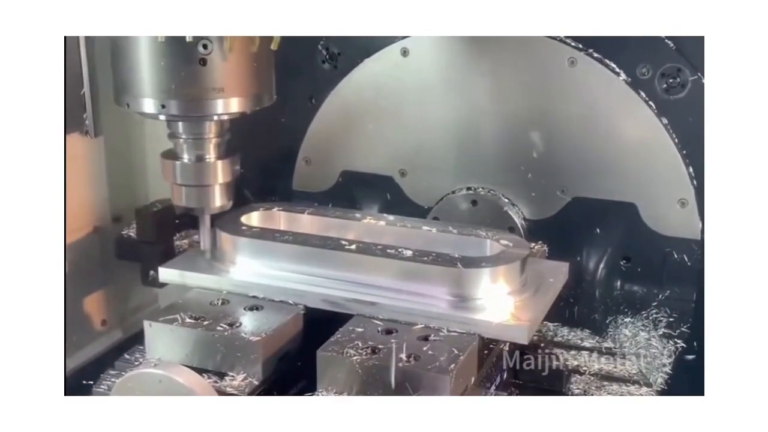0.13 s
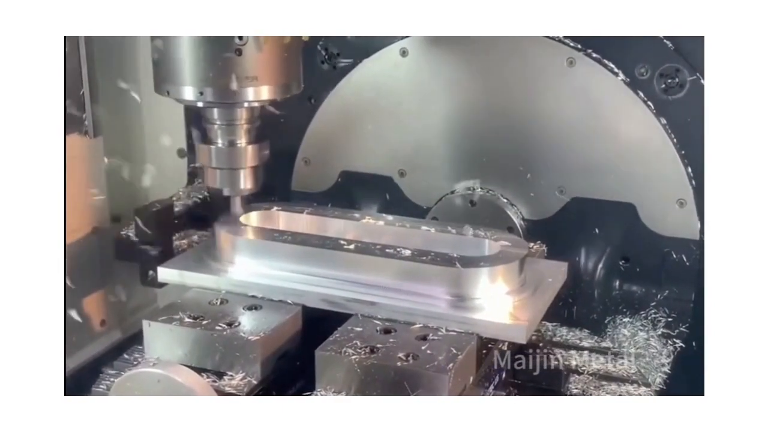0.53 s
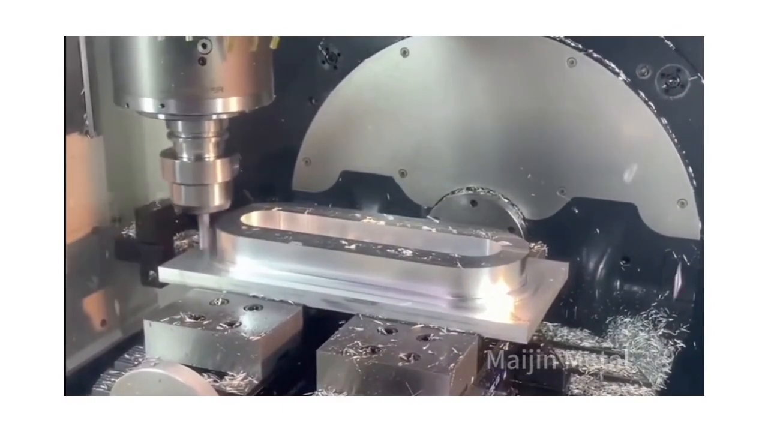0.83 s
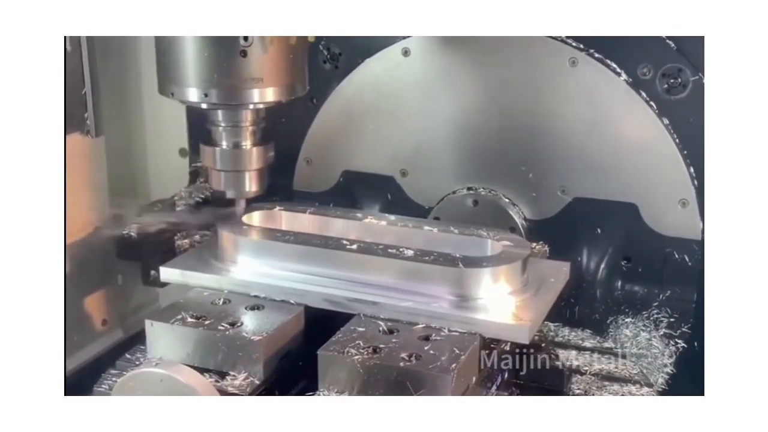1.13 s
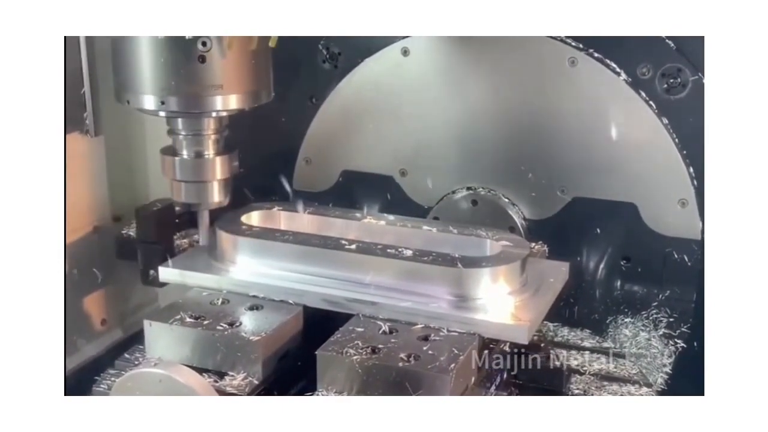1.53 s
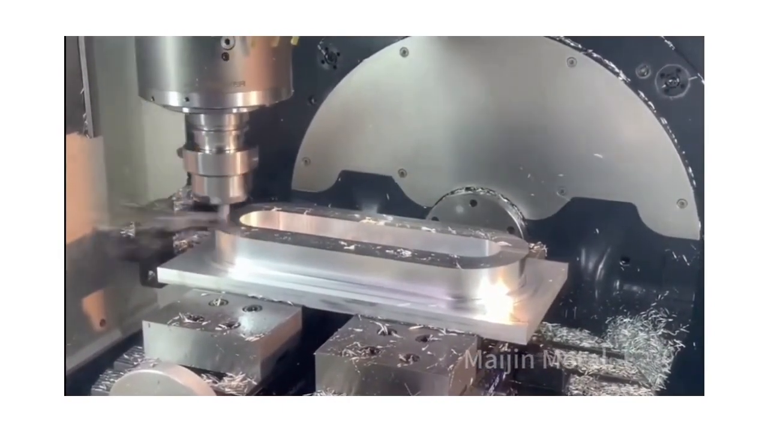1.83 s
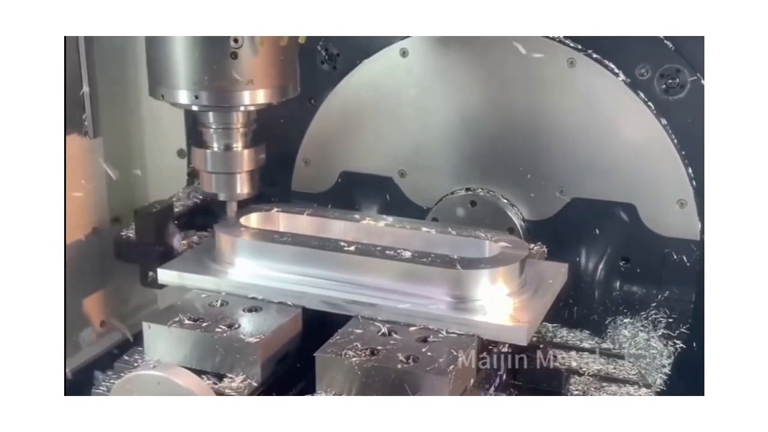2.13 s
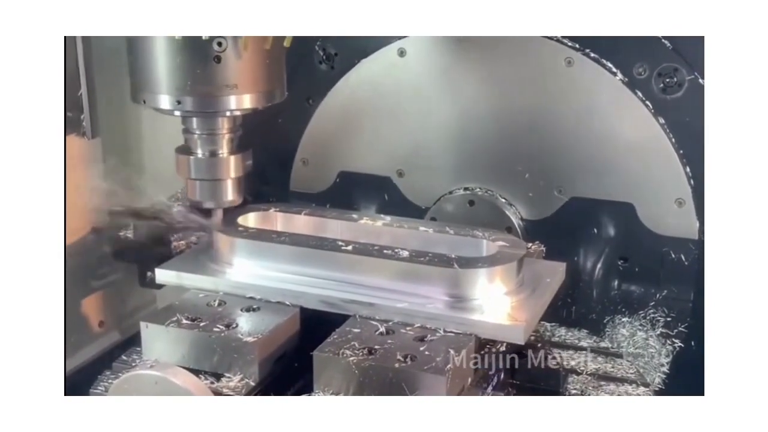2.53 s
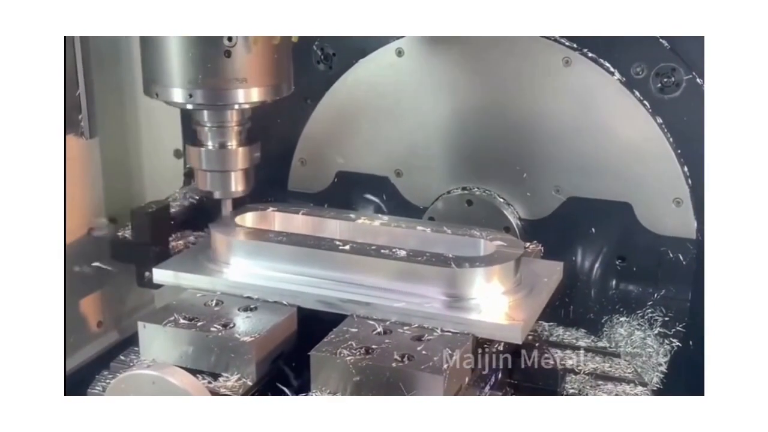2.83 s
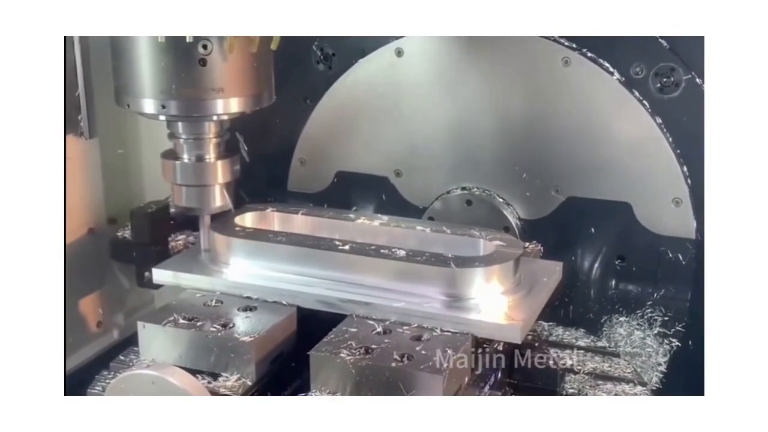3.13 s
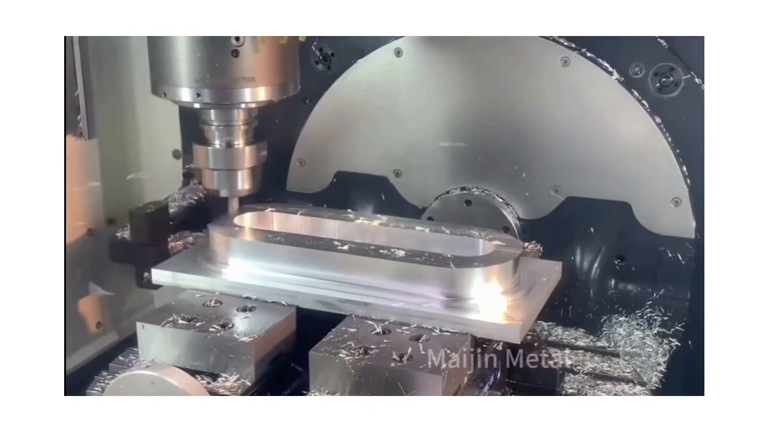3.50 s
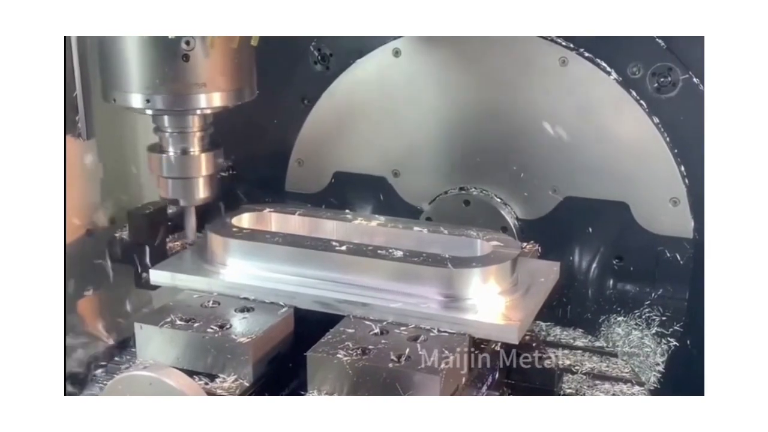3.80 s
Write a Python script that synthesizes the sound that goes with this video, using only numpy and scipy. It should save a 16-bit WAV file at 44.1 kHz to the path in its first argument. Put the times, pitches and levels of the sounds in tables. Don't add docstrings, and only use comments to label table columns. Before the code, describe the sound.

A milling machine spindle hums steadily while its cutter sings through aluminium in regular short sweeps.

```python
import sys
import numpy as np
from scipy import signal
from scipy.fft import rfft, irfft, next_fast_len
from scipy.io import wavfile
from scipy.ndimage import uniform_filter1d, map_coordinates

SR = 44100
rng = np.random.default_rng(int(sys.argv[2]) if len(sys.argv) > 2 else 0)


def dump_mix(stems):
    frames = np.atleast_2d(stems).T
    limited = np.clip(frames, -1, 1)
    pcm = np.round(limited * 32767).astype(np.int16)
    wavfile.write(sys.argv[1], SR, pcm)


def gain_from_db(level_db):
    decades = np.asarray(level_db, float) / 20
    return 10 ** decades


N = 174636
TIME = np.arange(N) / SR

# (deepest moment [s], strength [dB], length factor [-], entry squeak [dB], whistle [dB])
CUTS = [
    (0.044, 1.5, 0.99, -3, 2.5),
    (0.812, -0.5, 1.1, -11.5, -3.5),
    (1.583, -0.5, 0.98, -2.5, 0),
    (2.363, -1, 0.967, 0.5, 1.5),
    (3.102, -1.5, 0.87, 4, -17),
    (3.84, -2, 0.81, 5, -6),
]
STRENGTH, SQUEAK, WHISTLE = 1, 3, 4
TOOL_HZ = 9207, 11197


def unit(x):
    return x / np.sqrt(np.mean(x ** 2) + 1e-20)


def curve(rows):
    return np.interp(TIME, *np.transpose(rows))


def wobble(rate):
    coarse_steps = np.arange(0, N + 64, 64)
    smooth = map_coordinates(rng.standard_normal(400), [coarse_steps * rate / SR])
    return np.interp(np.arange(N), coarse_steps, smooth)


def stage(lag_s, width_s, fall_s=None, column=None, flat=2, follows=1):
    t = np.arange(0, N + 64, 64) / SR
    bells = 0
    for cut in CUTS:
        away = (t - cut[0]) / cut[2] - lag_s
        width = np.where(away > 0, fall_s or width_s, width_s)
        height = gain_from_db(follows * cut[column] if column else 0)
        bells = bells + height * np.exp(-.5 * np.abs(away / width) ** flat)
    return np.interp(TIME, t, bells)


def filtered(x, response):
    size = next_fast_len(N + 8192)
    return irfft(rfft(x, size) * response(np.fft.rfftfreq(size, 1 / SR)), size)[..., :N]


def rush(points, patchy_db):
    z = signal.stft(rng.standard_normal(N), nperseg=512)[2]
    patches = uniform_filter1d(rng.standard_normal(z.shape), 6, 0)
    patches = uniform_filter1d(patches, 10, 1)
    x = signal.istft(z * gain_from_db(patchy_db * unit(patches)), nperseg=512)[1][:N]
    f, db = np.transpose(points)
    return unit(filtered(x, lambda hz: gain_from_db(np.interp(np.log(hz + 1), np.log(f + 1), db))))


def tone(phase):
    return np.sqrt(2) * np.sin(phase + 2 * np.pi * rng.random())


def shaft():
    turns_per_s = 326.45 - 1.4 * stage(0, 0.0562, column=STRENGTH)
    return 2 * np.pi * np.cumsum(turns_per_s) / SR


def frame_rumble():
    # (frequency [Hz], level per Hz [dB])
    colour = [(12, -40), (30, 3), (60, -1.5), (95, -4.5), (170, -1), (260, -11), (450, -16), (1000, -27),
              (1500, -46)]
    return gain_from_db(-28.5 + 1.9 * wobble(3.2)) * rush(colour, patchy_db=1.5)


def air_hiss():
    # (frequency [Hz], level per Hz [dB])
    colour = [(500, -48), (1000, 0.5), (1500, 0), (2200, -2), (4000, -1), (6600, -2.5), (7300, -7),
              (8300, -4), (15500, -8.5)]
    return gain_from_db(-41 + 0.067 * wobble(4.8)) * rush(colour, patchy_db=1.1)


def pumps():
    # (pitch [Hz], level [dB], unsteadiness [dB], pitch drift [Hz])
    pump_tones = [
        (40.3, -41, 5.5, 0.95),
        (61, -36.5, -2, 1.66),
        (126.6, -47.5, 0, 2.96),
    ]
    # (time [s], level [dB])
    drive_effort = [(0.0, -19.5), (0.2, -50), (0.37, -27), (2.21, -29.5), (2.38, -16), (2.76, -28),
                    (2.86, -22.5), (3.28, -24), (3.32, -61), (3.36, -24.5), (3.75, -35), (3.78, -14),
                    (3.83, -40), (3.96, -20)]
    low = 0
    for hz, db, rough_db, drift_hz in pump_tones:
        angle = 2 * np.pi * np.cumsum(hz + drift_hz * wobble(7)) / SR
        low = low + gain_from_db(db + rough_db * wobble(14)) * tone(angle)
    effort = curve(drive_effort)
    return low * gain_from_db(effort - effort.mean())


def fan():
    # (time [s], level [dB])
    fan_level = [(0.0, -30), (0.05, -23), (0.21, -45), (0.3, -28.5), (0.45, -37), (0.82, -24.5),
                 (1.12, -39.5), (1.18, -54), (1.3, -30), (1.63, -31), (2.04, -43), (2.14, -26), (2.35, -41),
                 (2.47, -29), (3.62, -30), (3.68, -21.5), (3.84, -48), (3.96, -22)]
    angle = 2 * np.pi * np.cumsum(174 + 0.68 * wobble(6)) / SR
    return gain_from_db(curve(fan_level) + wobble(25)) * tone(angle)


def spindle(angle):
    # (multiple of shaft speed [-], level [dB], change at entry [dB], change in bite [dB],
    # unsteadiness [dB])
    hum = [
        (1, -27, -6.5, -1.5, 1.04),
        (2, -40, -2, 4.5, 0.5),
        (3, -46.5, 0.5, -2.5, 2.5),
    ]
    entry, bite = stage(-0.099, 0.061), stage(0.046, 0.1)
    out = 0
    for order, db, entry_db, bite_db, rough_db in hum:
        level = gain_from_db(db + entry_db * entry + bite_db * bite + rough_db * wobble(21.22))
        out = out + level * tone(order * angle)
    return out


def bearings(angle):
    level = gain_from_db(-69) + gain_from_db(-65) * stage(0.013, 0.049)
    return level * sum(gain_from_db(4 * wobble(9)) * tone(k / 2 * angle) for k in range(15, 55))


def chip_spray(angle):
    # (time [s], level [dB], length factor [-])
    bursts = [
        (.04, 3.5, 1.1),
        (0.822, 2, 1.1),
        (1.575, 2, 0.97),
        (2.37, 0, 0.85),
        (3.115, -1.5, 0.95),
        (3.85, -0.5, 0.71),
    ]
    # (frequency [Hz], level per Hz [dB])
    colour = [(1200, -52), (2200, -0.5), (3000, -8.5), (4500, 0), (8500, -2.5), (12500, -3.5), (15500, 1)]
    rise_s, fall_s = 0.022, 0.048
    spray = 0
    for start, db, length in bursts:
        width = length * np.where(TIME > start, fall_s, rise_s)
        spray = spray + gain_from_db(db) * np.exp(-.5 * ((TIME - start) / width) ** 2)
    pulse = 1 + 0.08 * np.cos(angle)
    return gain_from_db(-32) * spray * pulse * gain_from_db(0.7 * wobble(60)) * rush(colour, patchy_db=2)


def whistles(angle):
    # (level when free [dB], level in bite [dB], swing with the shaft [dB])
    levels = [
        (-52.5, -45.5, -11),
        (-103, -56.5, -30),
    ]
    bite = stage(0, 0.08, column=WHISTLE)
    out = 0
    for hz, (free_db, bite_db, swing_db) in zip(TOOL_HZ, levels):
        level = (gain_from_db(free_db) + gain_from_db(bite_db) * bite) * gain_from_db(1.5 * wobble(18))
        swing = 1 + 2 * gain_from_db(swing_db) * np.cos(angle)
        out = out + level * swing * tone(2 * np.pi * hz * TIME + .5 * wobble(40))
    return out


def teeth(angle):
    # (multiple of shaft speed [-], entry lead [s], entry [dB], bite [dB], exit [dB])
    rings = [
        (4, 0.15, -45.5, -42.5, -54.5),
        (5, 0.093, -47.5, -20.5, -44),
        (6, 0.17, -72, -47.5, -48.5),
        (7, 0.147, -55, -54, -54),
        (8, 0.21, -59, -50.5, -67),
        (10, .12, -119, -58, -103),
        (12, 0.092, -42, -49, -53.5),
    ]
    entry_s, bite_s, exit_s, exit_lag_s = 0.03, 0.069, 0.1, 0.14
    leave_s = 0.088
    rough_db = 3.5
    bite = stage(0, bite_s, column=STRENGTH, flat=2.1)
    bite = bite * np.minimum(1, stage(0, .3, 1.15 * leave_s, flat=8.7))
    leave = stage(exit_lag_s, bite_s, exit_s)
    out = 0
    for order, lead_s, entry_db, bite_db, exit_db in rings:
        if order == 5:
            follows, bite_rough_db, exit_db = -1.3, 0.5, -46
            entry_level = gain_from_db(-46)
        else:
            follows, bite_rough_db = float(order > 10), rough_db
            entry_level = -gain_from_db(entry_db + rough_db / 2 * wobble(29.89))
        entry = stage(-lead_s, entry_s, column=SQUEAK, follows=follows)
        level = gain_from_db(bite_db + bite_rough_db * wobble(29.83)) * bite
        level = level + gain_from_db(exit_db + rough_db * wobble(30.35)) * leave
        level = level + entry_level * entry
        out = out + tone(order * angle) * level
    return out


def scene():
    angle = shaft()
    background = frame_rumble() + air_hiss() + pumps() + fan()
    machine = spindle(angle) + bearings(angle)
    cutting = chip_spray(angle) + whistles(angle) + teeth(angle)
    return np.tile(background + machine + cutting, (2, 1))


def streaks(x):
    hz, _, z = signal.stft(x, SR, nperseg=2048)
    ratio = np.abs(z) / (uniform_filter1d(np.abs(z), size=12, axis=0) + 1e-9)
    gain = np.where(hz[:, None] > 2100, np.clip(ratio, 0, 1.6) ** 0.6, 1)
    return signal.istft(z * gain, SR, nperseg=2048)[1][:N]


def gaps_and_chirps(x):
    # (edge number [-], level [dB])
    chirps = [(12, -64), (13, -59), (14, -54), (15, -60), (16, -67), (17, -66), (18, -60), (19, -60),
              (20, -59), (21, -59), (22, -66)]
    # (frequency [Hz], leaning towards silence [-])
    gap_bias = [(8200, -3), (8900, -1.6), (9100, -.4), (10500, -.3), (11300, 1.3), (12500, .4), (14800, .7),
                (15300, 6)]
    edge_hz, chirp_width_hz = SR / 64, 27.5
    hz, t, z = signal.stft(x, SR, nperseg=1024)
    column_hz = hz[:, None]

    def at_frames(v):
        return np.interp(t, TIME, v)

    hole_shape = np.exp(-.5 * ((column_hz - 1854) / 185) ** 4)
    hole_db = -45 * at_frames(stage(-0.11, 0.024)) * hole_shape

    band = (hz / edge_hz * 2).astype(int) // 2
    frame = np.arange(len(t)) // 2
    luck = rng.standard_normal((band.max() + 2, len(t)))
    slow = uniform_filter1d(luck, size=2, axis=0)
    slow = unit(uniform_filter1d(slow, size=6, axis=1))
    odds = slow[band][:, frame] + .45 * slow[0, frame] + .1 * at_frames(stage(0, 0.35))
    off = odds + np.interp(hz, *np.transpose(gap_bias))[:, None] > 0
    off &= column_hz > gap_bias[0][0]

    stand_out = np.where(hz > 1e4, 3, 6)[:, None]
    tonal = np.abs(z) > stand_out * uniform_filter1d(np.abs(z), size=30, axis=0)
    tonal |= np.abs(column_hz - TOOL_HZ[1]) < 70

    edges = sum(gain_from_db(db) * np.exp(-.5 * ((hz - k * edge_hz) / chirp_width_hz) ** 2) for k, db in chirps)
    edge = np.round(hz / edge_hz).astype(int)
    near_off = uniform_filter1d(off * 1., size=9, axis=0) > .4
    near_off &= slow[edge][:, -1 - frame] > -.7

    spill_luck = unit(uniform_filter1d(luck[::-1], size=2, axis=1))
    spill = off * (spill_luck[band][:, frame] > 2.2)
    spill_level = gain_from_db(-8.5) * spill * uniform_filter1d(np.abs(z), size=12, axis=0)
    fill = signal.stft(rng.standard_normal((2, N)), SR, nperseg=1024)[2]
    fill = unit(np.abs(fill)) * np.exp(1j * np.angle(fill))
    wide = fill * (edges[:, None] * near_off + spill_level)
    kept = z * gain_from_db(hole_db) * (~off | tonal)
    return signal.istft(kept + wide, SR, nperseg=1024)[1][:, :N]


def band_limit(x):
    return signal.sosfilt(signal.butter(12, 15630, fs=SR, output="sos"), x)


def record(dry):
    mix = gaps_and_chirps(streaks(dry[0]))
    return band_limit(mix)


dry = scene()
out = record(dry)
dump_mix(out)
```